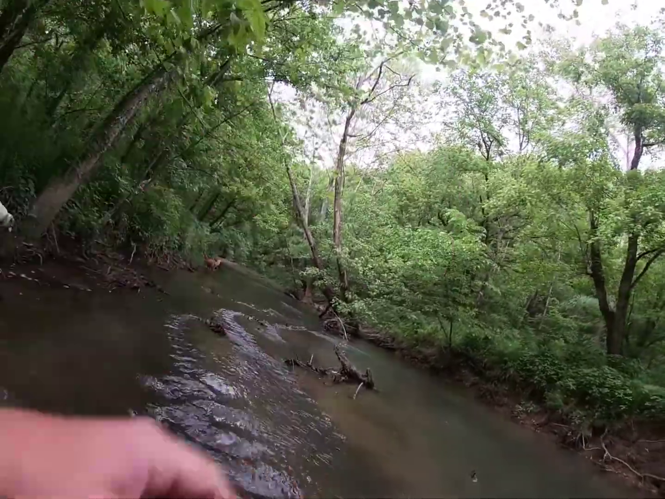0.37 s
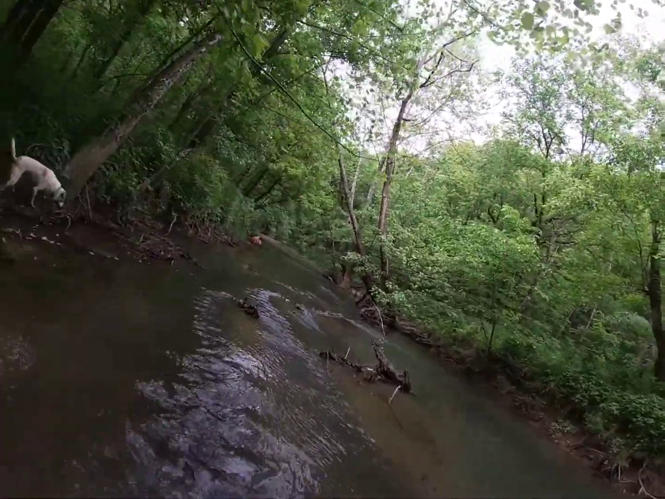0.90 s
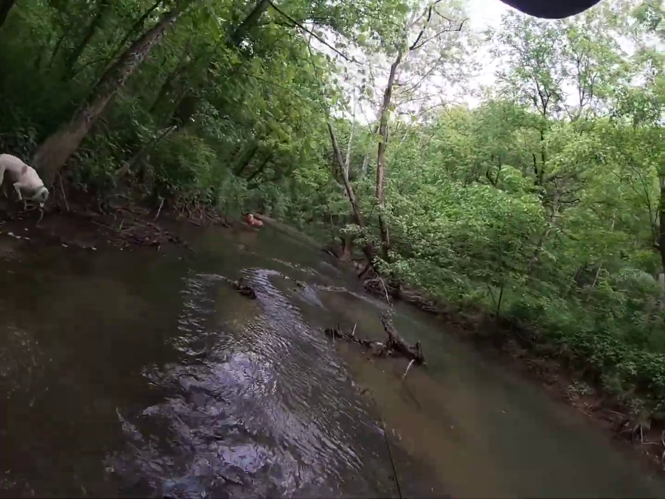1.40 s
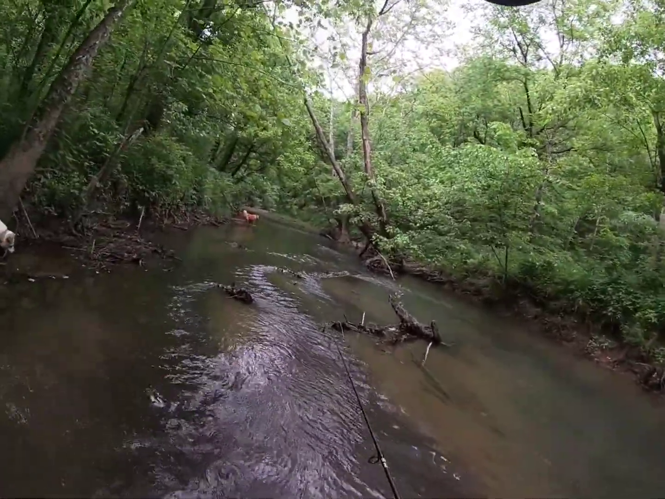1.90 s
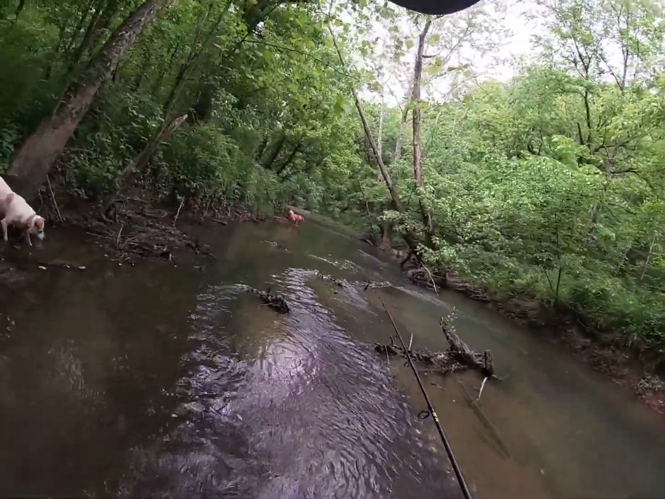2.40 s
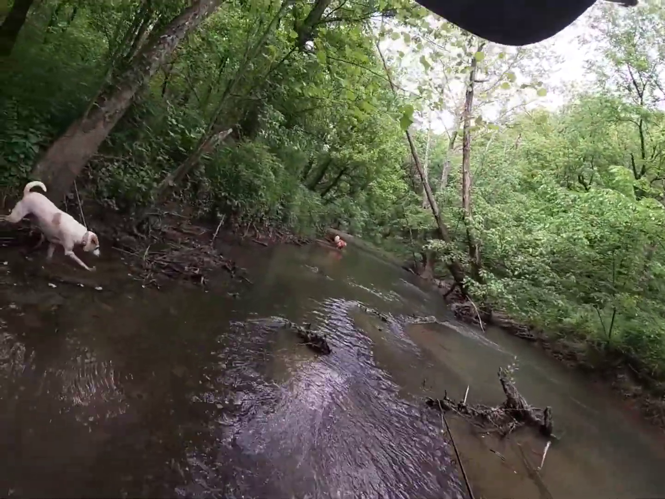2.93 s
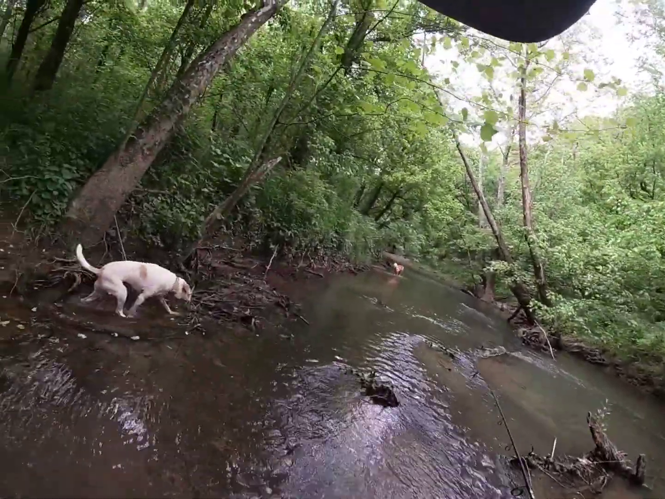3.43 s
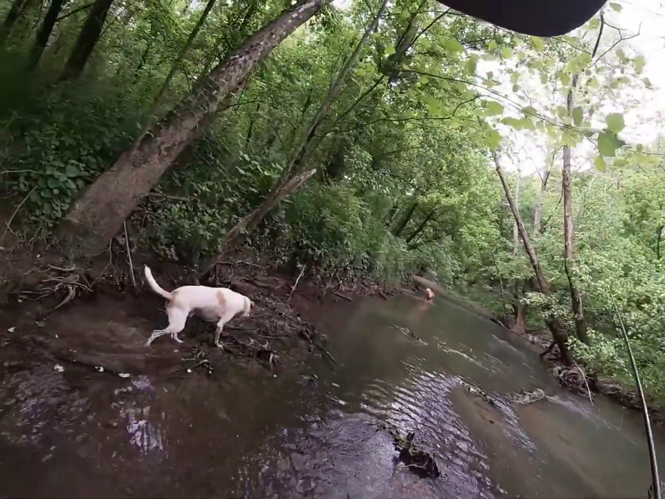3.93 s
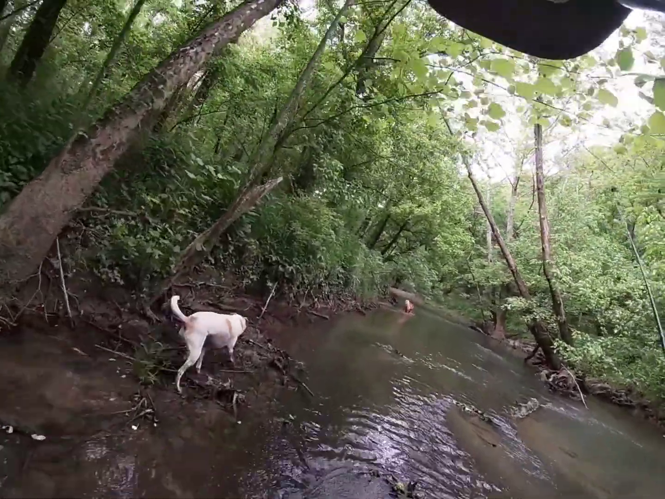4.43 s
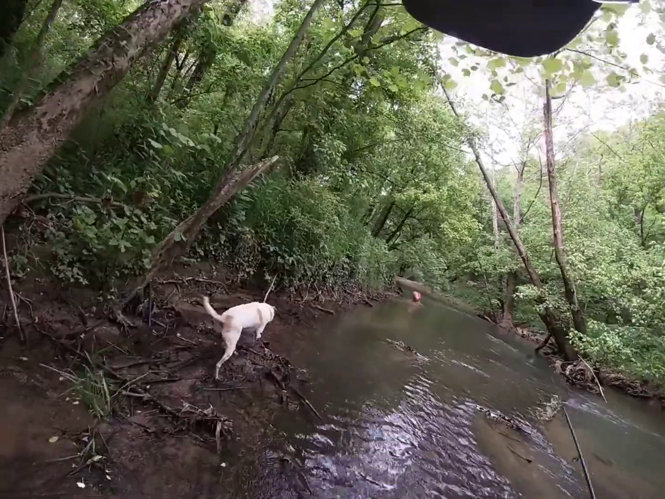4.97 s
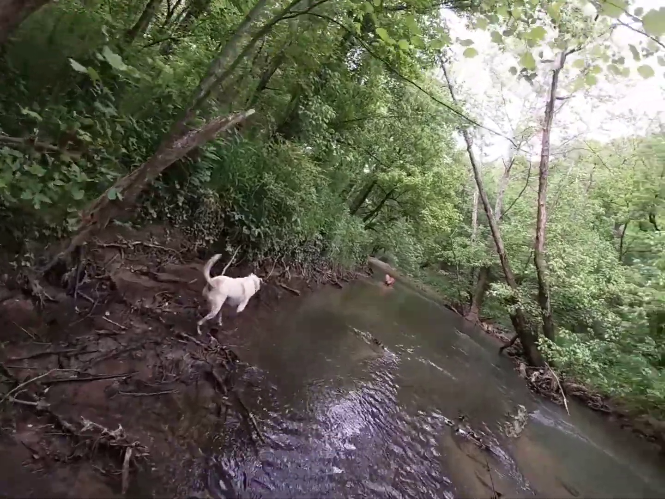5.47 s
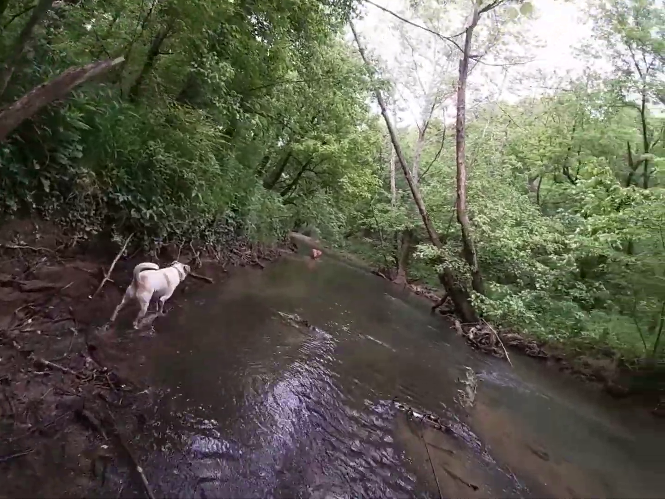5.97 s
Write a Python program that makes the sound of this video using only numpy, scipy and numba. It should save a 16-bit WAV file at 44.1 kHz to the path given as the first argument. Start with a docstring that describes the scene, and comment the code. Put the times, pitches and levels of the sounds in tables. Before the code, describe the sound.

A person wades down a shallow creek in the woods. Each stride sloshes and fizzes, with quick droplet patters and single plops and ticks between. A sealed head-worn microphone gives a boxy, ringing, muffled tone, and footfalls shake it with deep rumble and strap rubbing. A faint low hum wavers far off in the middle, and an especially strong plop lands around four seconds.

```python
"""Someone wades down a shallow wooded creek, about 6 s, a small sealed camera worn on the head.
From the start strides slosh and fizz as bubble swarms; drops plop and tick as single chirping bubbles.
Footfalls sway, jolt and rumble the mount; gear taps it; a steady noise hiss is the creek.
From 2.2 to 4.3 s a faint wavering sine hums far off; a strong plop lands just after 4 s.
Water sounds reach the microphone through the ringing case, a resonant filter, to the end."""
import sys
import numpy as np
from scipy import signal
from scipy.fft import rfft, irfft
from scipy.io import wavfile
from scipy.ndimage import uniform_filter1d
from numba import njit

SR = 44100
rng = np.random.default_rng(int(sys.argv[2]) if len(sys.argv) > 2 else 0)


def bounce(signal):
    """Save signal as a 16-bit WAV file at the path given by the first command-line argument."""
    frames = np.transpose(np.atleast_2d(signal))
    limited = np.clip(frames, -1, 1)
    pcm = np.round(limited * 32767).astype(np.int16)
    wavfile.write(sys.argv[1], SR, pcm)


def invert_db(level):
    """Linear amplitude ratio for a level in decibels (20 dB per decade), elementwise."""
    return 10 ** (np.asarray(level, dtype=float) / 20)


N = 268833


def unit(x):
    """Scale to rms 1."""
    return x / np.sqrt(np.mean(x ** 2))


def band(x, lo_hz, hi_hz, order=2):
    """Butterworth band-pass."""
    return signal.sosfilt(signal.butter(order, [lo_hz, hi_hz], "bandpass", fs=SR, output="sos"), x)


def noise_band(lo_hz, hi_hz):
    """Band-passed noise of rms 1."""
    return unit(band(rng.standard_normal(N), lo_hz, hi_hz))


def walk(rate_hz):
    """Random levels held 1 / rate_hz and slewed twice; rms 1."""
    hold = int(SR / rate_hz)
    held = np.repeat(rng.standard_normal(N // hold + 1), hold)
    slewed = uniform_filter1d(uniform_filter1d(held, hold), hold)
    return unit(slewed[:N])


def gushes(rate_hz, fall_s, size=4096):
    """Small gushes at random moments: each starts at once and drains away; mean 0, rms 1."""
    starts = (rng.random(N) < rate_hz / SR) * rng.random(N)
    drain = np.exp(-np.arange(size) / SR / fall_s)
    flow = np.tanh(1.3 * signal.fftconvolve(starts, drain)[:N])
    return unit(flow - flow.mean())


def swells(s, rise_s, fall_s, db, calm_db):
    """Level in dB of events that swell to a peak and die away over a calm level; powers add."""
    power = np.full(N // 64 + 1, invert_db(2 * calm_db))
    t = np.arange(len(power)) * 64 / SR
    for peak, rise, fall, top in np.broadcast(s, rise_s, fall_s, db):
        shape = np.where(t < peak, ((t - peak) / rise) ** 2, (t - peak) / fall)
        power = power + invert_db(2 * top) * np.exp(-2 * shape)
    return np.interp(np.arange(N) / SR, t, 10 * np.log10(power))


@njit
def bubbles(start, hz, cycles, size, glide, swell, n):
    """Each bubble is a sine that swells and dies; positive glide climbs in pitch, as near the surface."""
    out = np.zeros(n)
    for k in range(len(start)):
        decay = hz[k] / SR / cycles[k]
        fall, rise, opening = np.exp(-decay), np.exp(glide * decay), np.exp(-decay / swell)
        phase, a, step, closed = 0., size[k], 2 * np.pi * hz[k] / SR, 1.
        i = int(start[k])
        while a > size[k] / 200 and i < n and step < 3:
            out[i] += a * (1 - closed) * np.sin(phase)
            phase += step
            step *= rise
            a *= fall
            closed *= opening
            i += 1
    return out


def swarm(lo_hz, hi_hz, cycles, spread_db, count):
    """Many bubbles at random moments and pitches, a few far louder than the rest; rms 1."""
    when, pitch, luck = rng.random((count, 3)).T
    hz = lo_hz + (hi_hz - lo_hz) * pitch
    size = invert_db(-spread_db * np.log(1 - luck)) * np.sqrt(hz / hi_hz)
    return unit(bubbles(when * N, hz, cycles + 0 * hz, size, 0.1383, 0.059, N))


# broad colour of the case: (frequency [Hz], gain [dB])
CASE_COLOUR = [(120, -17.5), (250, -7.5), (600, -7.5), (1220, -10.5), (1640, -3.5), (2100, -3),
               (2880, -10.5), (4390, -25), (5400, -25.5), (6000, -30.5), (7200, -31), (8000, -38.5),
               (9800, -40), (11300, -46.5), (12000, -54), (14500, -48)]
# resonances of the case and one narrow dip: (frequency [Hz], width [Hz], gain [dB])
CASE_MODES = [(1740, 340, 5), (2295, 70, 4), (3460, 380, 6), (4810, 184, 6.5), (10580, 860, 8.5),
              (14200, 300, -6)]


def case_db(hz):
    """Gain of the case: broad colour plus its resonances and one narrow dip."""
    colour_hz, colour_db = np.transpose(CASE_COLOUR)
    broad = np.interp(np.log(hz + 1), np.log(colour_hz), colour_db)
    return broad + sum(db / (1 + (2 * (hz - f) / w) ** 2) for f, w, db in CASE_MODES)


def through_case(x, size=2048):
    """Causal filter from the cepstrum of the case gain, so that a tick rings after it lands."""
    cepstrum = irfft(np.log(invert_db(case_db(np.arange(size // 2 + 1) * SR / size))))
    cepstrum[1:size // 2] *= 2
    cepstrum[size // 2 + 1:] = 0
    return signal.fftconvolve(x, irfft(np.exp(rfft(cepstrum))))[:N]


def banks(x, t60_s=0.05, wet_db=-9, size=4096):
    """Water surface, banks and trunks scatter a brief tail behind every drop."""
    tail = rng.standard_normal(size) * 1000 ** (-np.arange(size) / SR / t60_s)
    return x + invert_db(wet_db) * signal.fftconvolve(x, tail / np.linalg.norm(tail))[:N]


# far hum: (time [s], pitch [Hz], rms level [dB])
HUM = [(2.2, 164.7, -67), (2.43, 157, -53), (2.998, 157, -59), (3.15, 151.1, -57), (3.35, 157.5, -54.5),
       (3.7, 158.5, -52), (4.299, 149, -60)]


def hum():
    """A faint wavering low sine that fades in and out."""
    t = np.arange(N) / SR
    s, hz, db = np.transpose(HUM)
    on = np.interp(t, [s[0], s[0] + .15, s[-1] - .15, s[-1]], [0, 1, 1, 0])
    phase = 2 * np.pi * np.cumsum(np.interp(t, s, hz)) / SR
    return on * np.sqrt(2) * invert_db(np.interp(t, s, db)) * np.sin(phase)


def creek():
    """Steady white hiss of the creek, ahead of the case."""
    return invert_db(-42.5) * rng.standard_normal(N)


# gear tapping the mount: (time [s], relative tap level [dB], tap pitch [Hz], relative thud level [dB])
KNOCKS = [(0.0652, -27.5, 845, -20), (1.374, -39, 960, -31), (2.0865, -19.5, 1160, -23.5),
          (3.612, -36.5, 640, -31), (4.575, -32, 760, -33), (4.768, -31, 955, -34), (4.954, -35, 580, -49),
          (4.989, -19, 1300, -29.5)]


def knocks():
    """A short dead tap that also rings the case, with a brief low thud of the mount near 150 Hz."""
    s, tap_db, tap_hz, thud_db = np.transpose(KNOCKS)
    tap = bubbles((s + 0.001) * SR, tap_hz, 0.38 + 0 * s, invert_db(tap_db + 3.0), 0.012, 0.24, N)
    thud = bubbles(s * SR, 150 + 0 * s, 0.42 + 0 * s, invert_db(thud_db + 5.5), .01, 0.31, N)
    return tap + invert_db(13) * through_case(tap) - thud


# short jolts of the strap: (peak time [s], relative rumble level [dB], relative rub level [dB])
JOLTS = [(0.312, -35.5, -40), (.35, -38, -36.5), (0.696, -18.5, -44), (.96, -34, -40.5), (1.03, -45, -43.5),
         (1.308, -24, -51), (1.37, -35, -60), (1.47, -55, -40), (1.57, -35, -43), (1.8, -47, -47),
         (1.91, -27, -62), (2.11, -29, -40), (2.17, -28, -35), (2.218, -25, -38), (2.299, -38, -48),
         (2.499, -33.5, -69.5), (2.79, -35.5, -42.5), (2.99, -29, -42.5), (3.04, -40, -58),
         (3.089, -23, -52), (3.31, -30.5, -63), (3.37, -29, -58), (3.654, -21, -41), (3.685, -20.5, -52),
         (3.798, -28, -40), (3.94, -31, -45), (4.2, -28, -50), (4.499, -18.5, -34), (4.581, -41, -36.5),
         (4.801, -35.5, -60), (4.92, -38, -56), (5.03, -25.5, -40), (5.129, -44, -40), (5.31, -31.5, -65),
         (5.702, -33, -47), (5.8, -32, -53), (5.88, -21.5, -33.5), (5.968, -35, -45)]
# long drags of strap on skin: (peak time [s], rise [s], fall [s], relative rub level [dB])
DRAGS = [(.33, .06, 0.29, -45), (.95, .15, 0.13, -54), (1.3, 0.2, 0.25, -46.5), (2.2, 0.12, 0.17, -48.5),
         (4.2, 0.21, 0.44, -42), (5.05, 0.19, 0.19, -54), (5.87, 0.11, 0.24, -39.5)]


def jolts(rise_s=0.014, fall_s=0.022, calm_rumble_db=-48, calm_rub_db=-54.5):
    """Strap and skin rumble and rub in jerks, as banded noise; each jolt holds one low blow."""
    s, rumble_db, rub_db = np.transpose(JOLTS)
    thump_hz, thump_cycles, thump_over_rumble_db, thump_lead_s = 62, 0.42, 5, 0.0109
    thump = bubbles((s - thump_lead_s) * SR, thump_hz + 0 * s, thump_cycles + 0 * s,
                    invert_db(rumble_db + thump_over_rumble_db), -0.29, 0.43, N)
    rumble_level_db = swells(s, rise_s, fall_s, rumble_db - 1, calm_rumble_db)
    short = np.transpose([s, rise_s + 0 * s, fall_s + 0 * s, rub_db])
    rub_level_db = swells(*np.vstack([short, DRAGS]).T, calm_rub_db)
    jerks = gushes(8.9, 0.036)
    rumble = noise_band(36.5, 56.3) * invert_db(rumble_level_db + 1.63 * jerks)
    rub = noise_band(61, 189.6) * invert_db(rub_level_db + 0.45 * jerks)
    return thump + rumble + rub


# lurches of the body, strongest at each footfall:
# (peak time [s], rise [s], fall [s], relative sway level [dB], relative hollow slosh level [dB])
# slosh() scales rise and fall
LURCHES = [(0.0, .03, 0.034, -12.5, -44.5), (.18, 0.12, 0.15, -24.5, -59.5), (.34, 0.077, 0.21, -29.5, -49),
           (.55, 0.021, 0.18, -50, -48.5), (0.706, 0.038, 0.055, -15, -47), (0.931, .05, 0.017, -22.5, -66),
           (1.06, 0.049, 0.023, -22.5, -62), (1.2, 0.025, 0.061, -24, -57), (1.31, 0.016, 0.15, -21.5, -81),
           (1.471, 0.036, 0.067, -11, -49.5), (1.6, 0.056, 0.064, -25, -79), (1.79, 0.074, .04, -26.5, -64),
           (1.92, 0.027, 0.12, -22, -74), (2.13, 0.038, 0.06, -19.5, -42),
           (2.24, 0.037, 0.068, -9.5, -53.5), (2.52, 0.11, 0.044, -25.5, -60.5),
           (2.68, 0.093, 0.033, -28.5, -77), (3.019, 0.029, 0.078, -10.5, -51.5),
           (3.381, 0.071, 0.067, -30.5, -76), (3.58, 0.044, 0.21, -22, -59),
           (3.801, 0.05, 0.066, -14.5, -48), (4.03, .04, 0.11, -24, -56), (4.3, 0.051, 0.064, -17.5, -78),
           (4.46, 0.024, 0.084, -11.5, -46), (4.77, 0.038, 0.13, -22.5, -62), (5.0, 0.091, 0.18, -26, -56),
           (5.13, 0.034, 0.1, -13.5, -51.5), (5.23, 0.075, 0.02, -13, -69), (5.42, 0.1, 0.063, -26, -68),
           (5.7, 0.049, 0.12, -19.5, -60), (5.831, 0.028, 0.066, -13, -47.5),
           (5.96, 0.046, 0.033, -16.5, -65)]


def sway(calm_db=-34.5):
    """The camera sways on its strap: a sine of wandering rate about 17 Hz, plus low noise."""
    level_db = swells(*np.transpose(LURCHES)[:4], calm_db)
    rate_hz = 17 * 2 ** (.45 * np.tanh(walk(12)))
    swing = unit(np.sin(2 * np.pi * np.cumsum(rate_hz) / SR))
    return (0.8 * swing + 0.36 * noise_band(17.8, 31.2)) * invert_db(level_db)


def slosh(calm_db=-61.5):
    """Large low bubbles, hollow, that follow the lurches 3.3 ms late and gush."""
    s, rise, fall, _, db = np.transpose(LURCHES)
    level_db = swells(s + 0.0033, 1.27 * rise, 0.85 * fall, db, calm_db)
    return swarm(264, 1195, 2.83, 2.38, count=2500) * invert_db(level_db + 1.4 * gushes(27, 0.023) + 8.5)


# water pushed up by the legs: (peak time [s], rise [s], fall [s], then relative levels of
# fizz [dB], spray [dB], finest mist [dB])
SURGES = [(0.0, 0.016, 0.11, -41, -49.5, -59.5), (.33, 0.057, 0.063, -46.5, -51, -60.5),
          (.44, 0.033, 0.094, -50, -49.5, -62.5), (.6, 0.033, 0.16, -45.5, -51, -60.5),
          (0.694, 0.018, 0.01, -36, -40, -51.5), (.79, 0.035, 0.02, -53.5, -56, -65),
          (.87, 0.023, 0.12, -52, -50, -64), (0.944, 0.013, 0.016, -46, -55, -57.5),
          (1.21, 0.015, 0.059, -42, -47.5, -76), (1.26, 0.05, 0.07, -43, -51, -62),
          (1.49, 0.06, 0.062, -45, -48.5, -58), (1.8, 0.23, 0.063, -55, -59, -73),
          (2.025, 0.036, 0.13, -47.5, -52, -63.5), (2.16, 0.081, 0.33, -47.5, -52, -61),
          (2.324, 0.019, 0.014, -31.5, -39.5, -58), (2.831, 0.05, 0.063, -56, -51, -61.5),
          (3.02, 0.079, 0.047, -49.5, -55, -61.5), (3.09, 0.023, 0.081, -47, -49.5, -60.5),
          (3.289, 0.068, 0.11, -47, -51.5, -65.5), (3.528, 0.036, 0.034, -48, -46, -61.5),
          (3.65, 0.033, 0.13, -58, -69, -69.5), (3.81, 0.21, 0.048, -41.5, -55, -66.5),
          (3.84, 0.016, 0.02, -54, -48, -50.5), (3.96, 0.057, 0.051, -47.5, -51, -61),
          (4.075, 0.016, 0.044, -45, -57, -78), (4.255, 0.059, 0.12, -50, -46, -62),
          (4.401, 0.049, .05, -41.5, -49, -57.5), (4.482, 0.05, 0.052, -43, -43, -53.5),
          (4.689, 0.08, 0.083, -51, -56, -76), (4.809, 0.023, 0.034, -55, -48, -66),
          (4.97, 0.11, 0.21, -48, -47.5, -66.5), (5.169, 0.088, 0.21, -43.5, -47, -64.5),
          (5.355, 0.0087, 0.025, -78, -50, -70), (5.614, 0.024, 0.046, -44, -46.5, -58.5),
          (5.78, 0.067, 0.18, -45, -48.5, -63.5), (5.92, .05, 0.13, -42, -47.5, -62.5),
          (6.07, 0.052, 0.043, -44.5, -56, -70)]


def surging_water(calm_fizz_db=-72.5, calm_spray_db=-60.5, calm_mist_db=-78.5):
    """Swarms of ever smaller, higher bubbles: fizz, spray and mist follow the surges and gush."""
    s, rise, fall, fizz_db, spray_db, mist_db = np.transpose(SURGES)
    fizz_db = swells(s, rise, fall, fizz_db, calm_fizz_db)
    spray_db = swells(s, rise, fall, spray_db, calm_spray_db)
    mist_db = swells(s, rise, fall, mist_db, calm_mist_db)
    gush, spit, flit = gushes(30, 0.036), gushes(42, 0.033), gushes(25, 0.0043)
    fizz = swarm(1102, 3345, 7.46, 1.83, count=3500) * invert_db(fizz_db + 2.9 * gush + 3.5)
    spray = swarm(3383, 5800, 9.1, 1.4, count=6000) * invert_db(spray_db + 1.9 * gush + 1.3 * spit + 16)
    mist = swarm(5860, 15000, 2.4, 1.45, count=25000) * invert_db(mist_db + 1.1 * spit + 1.76 * flit + 35.0)
    sparse_mist = swarm(5000, 12600, 6.8, 4.5, count=700) * invert_db(mist_db + 22)
    return fizz + spray + mist + sparse_mist


# quick patters of droplets: (time [s], relative level [dB], length [s], brightness [dB/octave])
SPLASHES = [(0.683, -19, 0.012, 1), (1.1993, -17, 0.026, 7), (1.249, -19, 0.023, 12),
            (1.4948, -35, 0.045, -16), (2.02, -14, 0.019, 5.5), (2.3093, -9.5, 0.026, 5),
            (2.811, -48, 0.026, 6), (3.036, -40.5, 0.028, 18.5), (3.0936, -17, 0.019, 8),
            (3.284, -24, 0.025, -1), (3.513, -30, 0.018, 19), (3.83, -32, 0.027, -11),
            (4.4802, -30, 0.049, 3.1), (4.9576, -16.5, 0.023, 10.5), (5.6065, -10, 0.028, 8),
            (5.906, -19, 0.026, -1)]


def splashes(count=45):
    """Droplets crowd the start of each splash, then thin out, shrink and rise in pitch."""
    s, db, length_s, bright_db = (np.repeat(c, count) for c in np.transpose(SPLASHES))
    when, pitch, luck = rng.random((len(s), 3)).T
    late = when ** 1.2
    hz = 700 * 2 ** (3.12 * pitch + 0.4 * late)
    size_db = db - 11 - 20.7 * late + bright_db * np.log2(hz / 2000) - 2.14 * np.log(1 - luck)
    return bubbles((s + length_s * late) * SR, hz, 2.35 + 0 * hz, invert_db(size_db), 0.18, 0.21, N)


def drips(count=90):
    """Rows for plops(): small drops at random moments, fewer high; about one in five hollow and softer."""
    when, pitch, size, kind = rng.random((count, 4)).T
    hollow = kind < .2
    hz = np.where(hollow, 560 * 2 ** (.6 * pitch), 1550 * 2 ** (1.7 * pitch ** 2))
    db = -42 + 12 * size - 5 * hollow - 4 * np.log2(hz / 1800) ** 2 * ~hollow
    return np.transpose([when * N / SR, db, hz, -5 + 0 * hz])


# single plops and ticks, loud and soft:
# (time [s], relative level [dB], bubble pitch [Hz], relative snap over bubble [dB])
PLOPS = [(0.064, -35, 1740, -16), (0.425, -32, 3620, -20), (0.637, -22, 1610, -23),
         (0.688, -5.5, 1740, -28), (0.697, -19, 4500, -27), (0.723, -23.5, 1680, -22),
         (0.848, -22.5, 1840, -13), (0.901, -24.5, 2180, -10), (0.934, -23, 1880, -15),
         (0.94, -28, 4890, -22), (1.204, -20, 2100, -9), (1.373, -25, 1640, -7), (1.499, -23, 500, -12),
         (1.646, -27.5, 2700, -2), (1.649, -30, 570, -13), (2.026, -14, 3460, -9), (2.074, -39, 1740, -7),
         (2.087, -5.5, 1680, -8.5), (2.216, -15.5, 2330, -6.5), (2.285, -28, 640, -20),
         (2.303, -17, 1700, -17), (2.322, -15, 2220, -3), (2.794, -25, 1970, -3), (2.822, -25, 861, -6),
         (2.826, -28.5, 5370, -22), (2.967, -29.5, 1660, -1), (3.024, -23.5, 3340, -15),
         (3.073, -20.5, 1810, -6), (3.098, -20, 2430, -20), (3.283, -26.5, 4840, -12),
         (3.322, -35.5, 4600, -11), (3.654, -33, 4870, -20), (3.651, -24, 1760, -14),
         (3.731, -21.5, 2400, -3), (3.766, -19, 2160, -22), (3.835, -22, 1790, 1.5),
         (3.843, -14.5, 1860, -4.5), (3.862, -12.5, 2420, -13), (3.968, -28, 3900, -6),
         (4.009, -2, 1740, -10.5), (4.078, -25.5, 1836, -16), (4.13, -18.5, 1740, -15),
         (4.168, -33.5, 5040, 6), (4.262, -24.5, 3600, -20), (4.284, -25, 1890, -19),
         (4.529, -26, 1680, 2.5), (4.573, -21.5, 765, -2.5), (4.768, -25.5, 1750, -14),
         (4.805, -23.5, 2950, -12), (4.954, -21, 2160, -7), (4.99, -16.5, 1650, -13),
         (5.02, -22, 2340, -10), (5.059, -21.5, 2295, -9), (5.112, -31, 760, -20), (5.15, -25, 2700, -18),
         (5.272, -22, 1950, -10), (5.309, -30, 2000, -16), (5.352, -24, 3350, -18.5),
         (5.602, -26, 2196, -14), (5.616, -12, 1770, -5.5), (5.789, -19.5, 1960, -16),
         (5.865, -16.5, 1870, -12), (5.891, -38, 1910, -13), (5.913, -20, 1740, 1), (5.955, -23, 3220, -7)]


def plops():
    """A bubble and the thin snap of the drop that made it; bubble levels allow for the case gain."""
    s, db, hz, snap_db = np.vstack([PLOPS, drips()]).T
    # higher pitch rings for more cycles, hard drops for fewer
    cycles = np.clip(2.16 + 1.1 * np.log2(hz / 1800) - 0.02 * (db + 33), .8, 8)
    plop = bubbles(s * SR, hz, cycles, invert_db(db + 2.0 - case_db(hz)), 0.036, 0.66, N)
    snap = bubbles((s + 0.00082) * SR, 3600 + 0 * s, .5 + 0 * s, invert_db(db + snap_db + 15.0), 0.041, 0.22, N)
    return plop + band(snap, 870, 9000)


def scene():
    """Airborne sound passes the case; the mount shakes the microphone directly; the hum is added."""
    water = creek() + slosh() + surging_water()
    drops = banks(splashes() + plops())
    shaking = knocks() + jolts() + sway()
    return (hum() + shaking + through_case(water + drops))[None]


def low_pass(x):
    """Removes everything above the highest recorded frequency."""
    return signal.sosfilt(signal.butter(12, 14170, fs=SR, output="sos"), x)


def record(dry):
    """Deliver the finished mix."""
    return low_pass(dry)


dry = scene()
out = record(dry)
bounce(out)
```